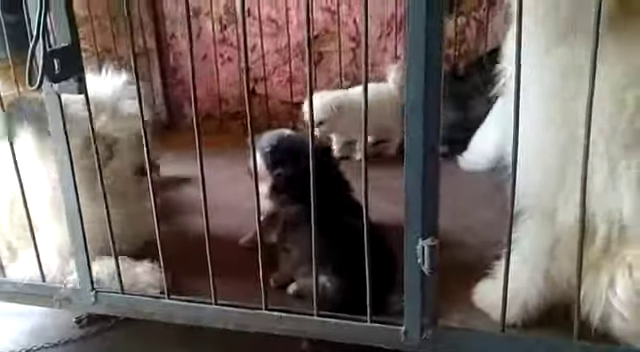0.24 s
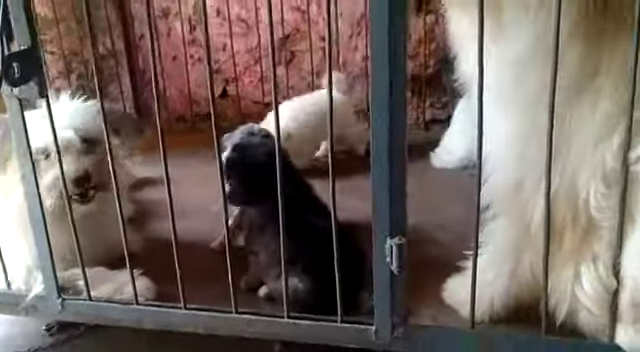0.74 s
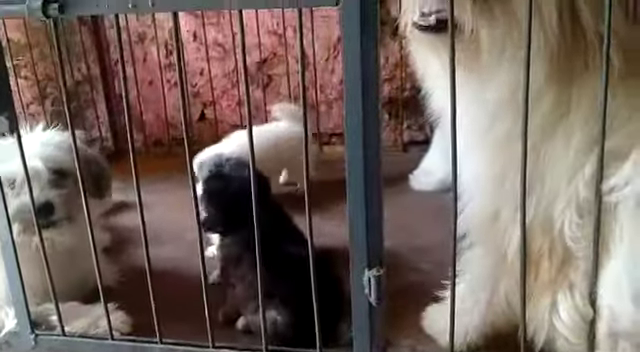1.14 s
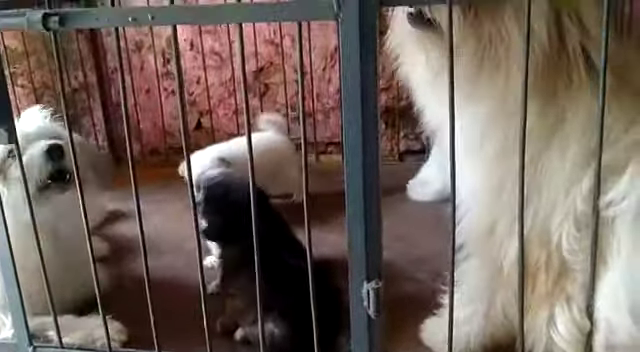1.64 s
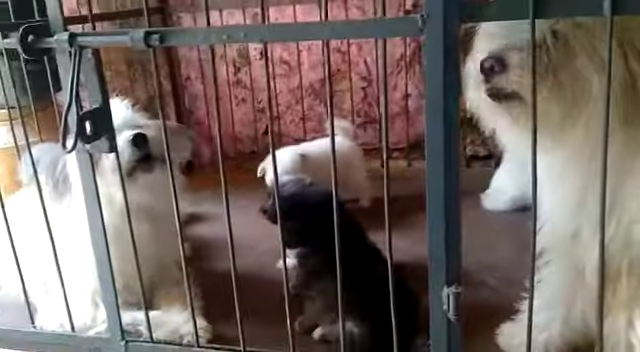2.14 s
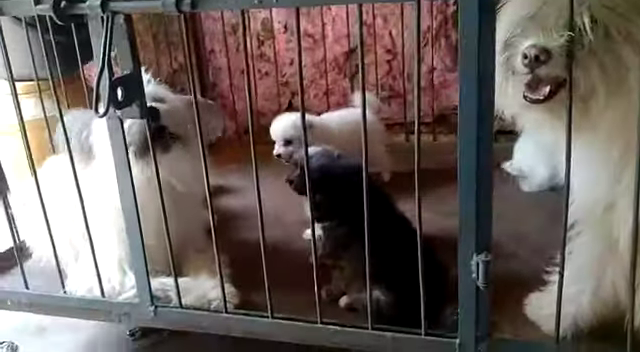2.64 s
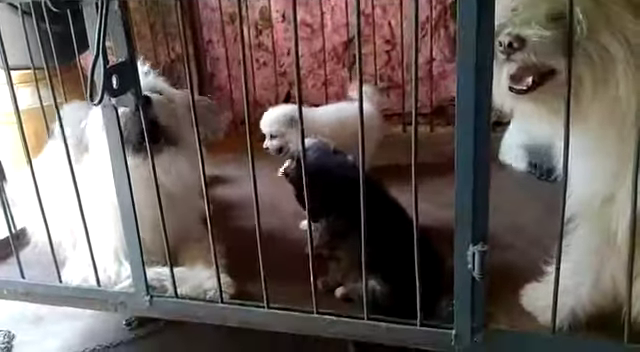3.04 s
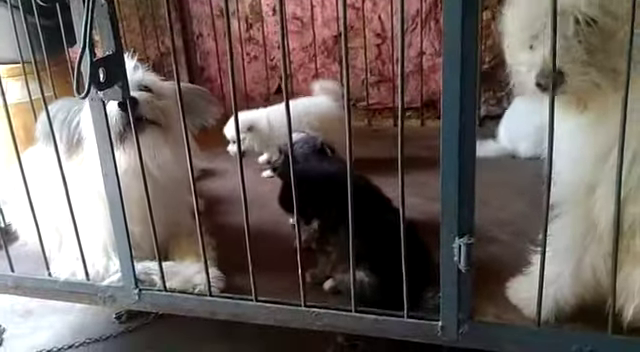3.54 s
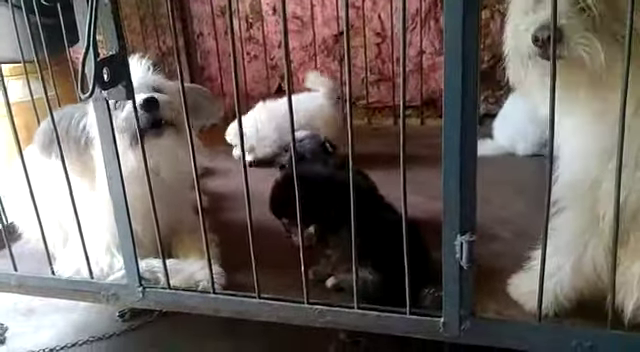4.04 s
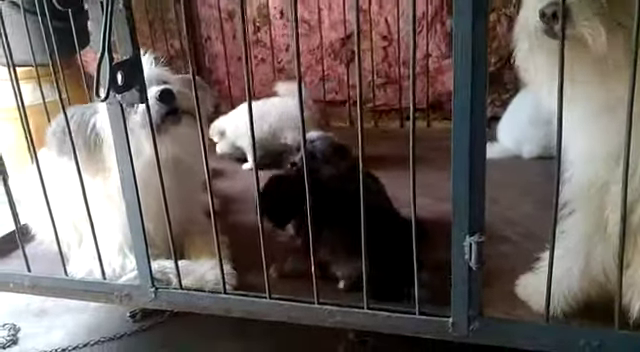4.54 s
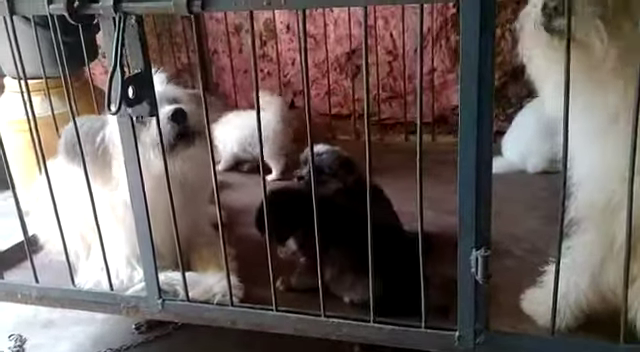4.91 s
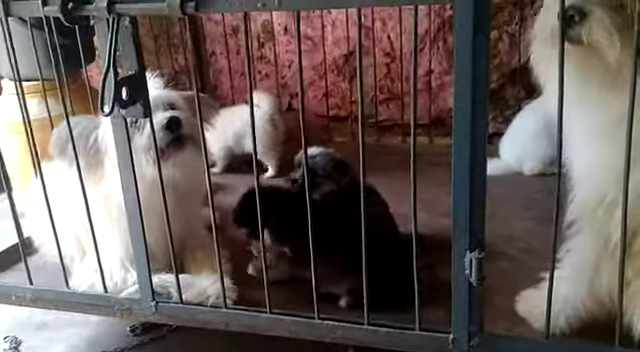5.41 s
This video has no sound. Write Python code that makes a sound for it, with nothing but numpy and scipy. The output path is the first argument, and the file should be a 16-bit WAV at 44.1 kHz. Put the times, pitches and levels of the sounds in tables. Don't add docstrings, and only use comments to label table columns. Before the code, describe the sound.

In a hard, echoing kennel, a small dog gives a wavering outcry and a string of gliding yelps, pauses, then yelps again until just past five seconds. Before it, another dog puffs twice through its nose and rustles its fur. A tiny collar jingle and faint nasal whine fill the pause. Low wind rumble, thumps and a dull far hum run underneath on a handheld microphone.

```python
import sys
import numpy as np
from scipy import signal
from scipy.fft import rfft, irfft, next_fast_len
from scipy.io import wavfile
from scipy.ndimage import uniform_filter1d, minimum_filter1d, map_coordinates

SR = 44100
rng = np.random.default_rng(int(sys.argv[2]) if len(sys.argv) > 2 else 0)


def boost(x):
    u = np.asarray(x, float) / 20
    return 10 ** u


def put_to_file(sound):
    columns = np.atleast_2d(sound).T
    safe = np.clip(columns, -1, 1)
    whole_steps = np.round(safe * 32767)
    wavfile.write(sys.argv[1], SR, whole_steps.astype(np.int16))


N = 250120
TOP_HZ = 15850


def unit(x):
    return x / np.sqrt(np.mean(x ** 2) + 1e-20)


def along(points, hz):
    f, v = np.transpose(points)
    return np.interp(np.log(hz + 1), np.log(f + 1), v)


def curves(rows, t):
    s, *cols = np.transpose(rows)
    return [np.interp(t, s, c) for c in cols]


def wobble(rate, size, order=3):
    knots = rng.standard_normal(int(size * rate / SR) + 4)
    return map_coordinates(knots, [np.arange(size) * rate / SR], order=order)


def noise(gain):
    m = next_fast_len(N)
    spectrum = rfft(rng.standard_normal(m)) * gain(np.fft.rfftfreq(m, 1 / SR))
    return unit(irfft(spectrum, m)[:N])


def coloured(points):
    return noise(lambda f: boost(along(points, f)))


def peaks(modes, f):
    return sum(boost(db) * (f * w) ** 2 / ((c * c - f * f) ** 2 + (f * w) ** 2) for c, w, db in modes)


def patchy(x):
    z = signal.stft(x, nperseg=512)[2]
    field = uniform_filter1d(rng.standard_normal(z.shape), size=5, axis=0)
    field = uniform_filter1d(field, size=4, axis=1)
    clots_db = 6.5 * unit(field)
    return unit(signal.istft(z * boost(clots_db), nperseg=512)[1][:N])


def bursts(tables, column):
    t = np.arange(N) / SR
    out = 0
    for rows in tables:
        edge = np.clip(np.minimum(t - rows[0][0], rows[-1][0] - t) / 0.0016, 0, 1)
        out = out + edge * boost(curves(rows, t)[column])
    return out


def strand(rows, scatter):
    hz = curves(rows, np.arange(N) / SR)[0] * (1 + scatter * wobble(120, N))
    tone = np.sin(2 * np.pi * np.cumsum(hz) / SR)
    return np.sqrt(2) * bursts([rows], 1) * boost(3.4 * wobble(60, N)) * tone


# frequency in Hz, level in dB per Hz.
HUM_COLOUR = [(180, -24), (300, -2), (392, -29), (470, -2.5), (555, -10.5), (624, -6), (737, -8),
              (946, 0.5), (1340, -2), (1720, -2), (2140, -1.5), (4910, -22), (16000, -34)]


def hum(over_db):
    return boost(-44.5 - 0.8 * over_db + 2.5) * coloured(HUM_COLOUR)


# time in seconds, strength in dB.
STEADY_AIR = [(0, -25), (.3, -25), (.42, -29.5), (.9, -30.5), (1.2, -35), (1.5, -26.5), (2.1, -23.5),
              (2.8, -25.5), (3.3, -38), (3.5, -27.5), (4.2, -30.5), (4.8, -25.5), (5.3, -27.5),
              (5.5, -27.5), (5.58, -32), (5.67, -30.5)]
# middle in seconds, half length in seconds, strength in dB.
GUSTS = [(0.338, 0.013, -14.5), (0.651, 0.029, -32.5), (0.729, 0.016, -15.5), (1.021, 0.046, -14.5),
         (1.137, 0.014, -29), (1.296, 0.052, -31.5), (1.746, 0.025, -14.5), (1.993, 0.1, -13),
         (2.28, 0.15, -17), (2.432, 0.019, -13.5), (2.633, 0.036, -14.5), (2.812, 0.046, -9.5),
         (2.942, 0.035, -18.5), (3.189, 0.066, -18.5), (3.66, 0.022, -35), (3.886, 0.03, -26.5),
         (4.124, 0.05, -18.5), (4.094, 0.05, -20.5), (4.388, 0.027, -19), (4.48, 0.042, -13),
         (4.569, 0.028, -16), (4.794, 0.03, -21), (4.669, 0.032, -21.5), (4.928, 0.032, -27),
         (5.266, 0.028, -20), (5.639, 0.0085, -21)]
# frequency in Hz, level in dB per Hz.
RUMBLE_COLOUR = [(8.8, -38), (15, -1), (32, 1.5), (70, 1.5), (140, -6), (200, -23.5), (260, -53.5),
                 (440, -120)]
# frequency in Hz, level in dB per Hz.
FLUTTER_COLOUR = [(80, -38.5), (150, 1.5), (250, -1), (400, -9), (700, -21), (1200, -45.5), (2000, -120)]
# time in seconds, peak in dB, pitch in Hz.
THUMPS = [
    (0.112, -23, 94.2),
    (0.334, -9, 100),
    (0.347, -17.5, 141),
    (0.377, -12.5, 156),
    (0.932, -20.5, 99),
    (1.007, -14, 96),
    (1.118, -17.5, 114),
    (1.213, -24.5, 62.5),
    (3.884, -26.5, 231),
    (5.618, -24, 65.4),
]


def wind(over_db):
    t = np.arange(N) / SR
    gusts = sum(boost(db) * np.exp(-((t - s) / half) ** 2) for s, half, db in GUSTS)
    strength_db = 20 * np.log10(boost(curves(STEADY_AIR, t)[0]) + gusts)
    rumble_db = strength_db - 2.5 * over_db
    flutter_db = -36.5 + 1.396 * (strength_db + 28.0) - 3.37 * over_db
    lumps = wobble(25, N)
    out = boost(rumble_db - 3.5) * unit(boost(2.0 * lumps) * coloured(RUMBLE_COLOUR))
    flutter_lumps = boost(3 * lumps + 2.5 * wobble(60, N))
    out += boost(flutter_db - 1.5) * unit(flutter_lumps * coloured(FLUTTER_COLOUR))
    t = np.arange(-SR // 50, SR // 50) / SR
    for s, db, hz in THUMPS:
        u = np.pi * hz * t
        push = (1 - 2 * u * u + 1.2 * u) * np.exp(-u * u)
        push = push + .5 * np.exp(-(4 * u) ** 2) + .12 * np.exp(-(11 * u) ** 2)
        out[round((s + .002) * SR) - SR // 50:][:len(t)] += boost(db + 1.5) * push
    return out


# time in seconds, pitch in Hz, level in dB.
WHINE = [(3.44, 790, -52), (3.49, 750, -41), (3.52, 720, -46), (3.54, 720, -37), (3.6, 680, -46),
         (3.64, 740, -36), (3.66, 700, -48), (3.675, 660, -38), (3.745, 740, -41), (3.8, 640, -48),
         (3.86, 630, -39), (3.885, 620, -36)]


def whine():
    return boost(-7 + 3 * wobble(30, N)) * strand(WHINE, scatter=.1)


# time in seconds, peak in dB.
JINGLE = [
    (3.49, -49),
    (3.519, -43),
    (3.552, -38),
    (3.5857, -45),
    (3.6344, -51),
]
# frequency in Hz, level in dB, time to fall 60 dB in seconds.
TAG_RING = [(3700, -7, .03), (4960, 6, 0.041), (5970, 6.5, 0.023), (7640, 14, 0.012)]
# time in seconds, peak in dB.
TICK = [
    (1.9641, -10.5),
]
# time in seconds, peak in dB, lowest frequency in Hz.
SMACKS = [
    (0.335, -33.5, 500),
    (0.379, -34.5, 500),
    (0.709, -25.5, 1500),
    (2.607, -37.5, 9250),
    (3.034, -31.5, 4000),
]


def metal_and_clicks():
    out, t = np.zeros(N), np.arange(SR // 8) / SR
    for s, db in JINGLE:
        ring = 0
        for hz, level, t60 in TAG_RING:
            fade = boost(level + rng.normal(-3, 4) - 60 * t / t60)
            ring = ring + fade * np.sin(2 * np.pi * hz * rng.normal(1, .04) * t)
        out[round(s * SR):][:len(t)] += boost(db - 10) * ring * (1 - np.exp(-t / 0.00054))
    for s, db in TICK:
        out[round((s + .0015) * SR):][:3] += boost(db + 6.0) * np.array([.6, 1, .4])
    for s, db, low_hz in SMACKS:
        high_pass = signal.butter(2, low_hz, 'high', fs=SR)
        crack = signal.lfilter(*high_pass, rng.standard_normal(len(t)))
        out[round(s * SR):][:len(t)] += boost(db - 60 * t / 0.014) * crack
    return out


# start, peak and end in seconds, level in dB.
RUSTLE = [
    (0.0, 0.041, 0.17, -45),
    (0.263, 0.36, 0.53, -42),
    (0.5, 0.533, 0.72, -49),
    (1.203, 1.355, 1.59, -39),
    (5.585, 5.622, 5.7, -42.5),
]
# frequency in Hz, level in dB per Hz.
FUR_COLOUR = [(1760, -16.5), (3000, -6), (5330, -3.5), (5880, -7), (6620, -5), (9460, -14.5), (16000, -3)]


def fur():
    rise_db, fade_db = 16.5, 26.5
    brushes = [[(a, db - rise_db), (b, db), (c, db - fade_db)] for a, b, c, db in RUSTLE]
    return bursts(brushes, 0) * boost(1.1 * wobble(84, N)) * coloured(FUR_COLOUR)


# time in seconds, hiss in dB, nose ring in dB.
SNORTS = [
    [(.7075, -9, -55), (.715, -16.5, -76), (.74, -23.5, -31), (.752, -24, -25), (.764, -33, -34.5),
     (.78, -41, -48), (.83, -46, -67), (.96, -64.5, -65)],
    [(.965, -53, -49), (.985, -42, -26.5), (1.005, -32, -15), (1.035, -29, -21.5), (1.047, -51, -33.5),
     (1.08, -63, -50)],
]
# frequency in Hz, level in dB per Hz.
SNORT_COLOUR = [(180, -13), (300, -5), (978, 0.5), (1430, 0), (1780, -6.5), (2520, 0), (3950, -10),
                (8500, 1), (9880, -4), (11100, -2.5), (16000, -2)]
# frequency in Hz, level in dB per Hz.
SNIFF_COLOUR = [(300, -20), (1700, -4), (2500, 0.5), (4000, -9), (5800, -4.5), (8500, -4.5), (10500, -16),
                (16000, -8.5)]
# frequency in Hz, width in Hz, level in dB.
NOSE = [(2030, 280, -3), (2393, 280, 1), (2800, 930, -8.5), (5570, 1030, -15)]


def snorts():
    hiss = 0
    for rows, colour in zip(SNORTS, [SNORT_COLOUR, SNIFF_COLOUR]):
        hiss = hiss + bursts([rows], 0) * coloured(colour)
    hiss = hiss * boost(1.3 * wobble(80, N))
    ring = bursts(SNORTS, 1) * boost(0.53 * wobble(96.2, N)) * noise(lambda f: peaks(NOSE, f))
    return hiss + ring


# frequency in Hz, time to fall 60 dB in seconds.
ROOM_RING = [(300, .4), (600, .42), (820, .46), (1050, .5), (1300, .37), (1600, .6), (2200, .35),
             (5000, .35), (12000, .2)]
# delay in seconds, level in dB.
SLAPS = [
    (.003, -4),
    (.011, -6),
    (.032, -4),
    (.074, -12),
]


def kennel(x):
    hz, t, z = signal.stft(rng.standard_normal(int(SR * .7)), SR, nperseg=256)
    decay = boost(-60 * t / along(ROOM_RING, hz)[:, None])
    tail = signal.istft(z * decay, SR, nperseg=256)[1]
    tail = tail / np.linalg.norm(tail)
    for s, db in SLAPS:
        tail[round(s * SR)] += boost(db)
    return signal.fftconvolve(np.pad(x, (350, 0)), tail)[:N]


def arch(start, top, end, top_hz, db, tied_in, tied_out):
    rest_hz, land_hz, top_hold_s, tied_share = 600, 590, .007, 0.3
    t = np.linspace(start, end, num=40)
    up = t < top
    climb = np.clip((t - start) / max(top - top_hold_s - start, 1e-9), 0, 1) ** 1.25
    fall_s = .017 + .1 * (end - top)
    fall = np.exp(-(np.clip(t - top - top_hold_s, 0, None) / fall_s) ** 1.5)
    low_hz = np.where(up | tied_out, rest_hz, land_hz)
    hz = low_hz + (top_hz - low_hz) * np.where(up, climb, fall)
    attack = 8 * (tied_share if tied_in else 1) * (top > start + .01) * np.clip(1 - (t - start) / .03, 0, 1)
    release = 19.5 * (tied_share if tied_out else 1) * np.clip(1 - (end - t) / 0.033, 0, 1)
    release = release + 18 * ~up * np.exp(-((hz - 1170) / 230) ** 2)
    db = db + 3.5 * np.exp(-((hz - 780) / 170) ** 2)
    high = 1 / (1 + np.exp((1040 - hz) / 60))
    half_db = EVEN_DB + high * (np.where(up, -14, -45) - EVEN_DB)
    return list(zip(t, hz, db - attack - release, half_db))


# time in seconds, pitch in Hz, level in dB, half-pitch line in dB.
CRIES = [
    [(1.514, 600, -26, -10), (1.54, 745, -15, -30), (1.555, 760, -14, -36), (1.568, 860, -19, -37)],
    [(1.574, 1250, -23, -12), (1.6, 1260, -20, -14), (1.635, 1275, -16, -22), (1.668, 1230, -26, -20),
     (1.678, 1190, -15, -28), (1.72, 1180, -11, -22), (1.765, 1210, -17, -16)],
    [(1.768, 1300, -15, -20), (1.773, 1450, -14, -31), (1.795, 1385, -13, -36), (1.83, 1360, -13, -40),
     (1.86, 1300, -12, -40), (1.869, 1280, -22, -40), (1.88, 1265, -10, -46), (1.93, 1290, -8, -46),
     (1.955, 1340, -10, -36), (1.968, 1400, -13, -44)],
    [(1.972, 1380, -17, -43), (1.983, 1100, -28, -43), (1.99, 930, -15, -43), (2.0, 900, -14, -43),
     (2.04, 940, -13, -36), (2.051, 1000, -25, -30), (2.06, 1080, -14, -20), (2.09, 1190, -16, -12),
     (2.111, 1480, -15, -15)],
    [(2.181, 600, -19, -28), (2.205, 600, -17, -28), (2.225, 660, -18, -24), (2.24, 820, -16, -24),
     (2.258, 970, -15, -24), (2.275, 1090, -18, -15), (2.295, 1270, -17, -13), (2.314, 1370, -17, -14)],
]
# time in seconds, pitch in Hz, level in dB, half-pitch line in dB.
LATE_CRIES = [
    [(3.882, 800, -18, -20), (3.897, 820, -16, -20), (3.905, 610, -16, -36), (3.915, 660, -12, -36),
     (3.93, 800, -12, -35), (3.946, 850, -15, -30), (3.951, 1000, -34, -20), (3.957, 1250, -18, -12),
     (3.975, 1280, -15, -14), (3.999, 1340, -13, -24)],
    [(4.145, 640, -25, -30), (4.17, 720, -16, -30), (4.19, 900, -14, -25), (4.205, 900, -20, -20),
     (4.215, 1050, -34, -20), (4.222, 1170, -15, -17), (4.25, 1420, -16, -15), (4.257, 1650, -14, -18),
     (4.269, 1660, -15, -30)],
    [(4.975, 600, -24, -36), (4.99, 680, -13, -36), (5.012, 880, -13, -30), (5.025, 1000, -25, -20),
     (5.035, 1300, -15, -17), (5.052, 1620, -16, -17), (5.07, 1660, -14, -24), (5.086, 1540, -17, -40)],
    [(5.09, 1100, -30, -40), (5.1, 860, -12, -40), (5.12, 750, -18, -36), (5.14, 700, -19, -36),
     (5.168, 640, -27, -36)],
]
# start, top and end in seconds, top pitch in Hz, level in dB.
ARCHES = [
    (2.112, 2.112, 2.18, 1480, -17),
    (2.315, 2.315, 2.385, 1370, -18),
    (2.455, 2.555, 2.62, 1560, -16),
    (2.688, 2.785, 2.855, 1590, -16),
    (3.015, 3.105, 3.17, 1600, -17),
    (4.0, 4.0, 4.085, 1340, -16),
    (4.27, 4.27, 4.43, 1660, -19),
    (4.431, 4.51, 4.585, 1320, -16),
    (4.696, 4.795, 4.885, 1570, -17),
]
EVEN_DB = -26


def calls():
    def near(s, times):
        return any(abs(s - other) < .005 for other in times)

    starts = [a[0] for a in ARCHES] + [rows[0][0] for rows in CRIES]
    ends = [a[2] for a in ARCHES]
    pieces = CRIES + LATE_CRIES + [arch(*a, near(a[0], ends), near(a[2], starts)) for a in ARCHES]
    out = []
    for rows in sorted(pieces, key=lambda rows: rows[0][0]):
        if out and near(rows[0][0], [out[-1][-1][0]]):
            out[-1] = out[-1] + rows
        else:
            out.append(list(rows))
    return out


def mouth_open(t):
    since = t - CRIES[0][0][0]
    outcry = 2 * (since > 0) * np.exp(-np.abs(since) / 0.15)
    tops = [*np.transpose(ARCHES)[1], 5.068]
    return outcry + sum(np.exp(-((t - top + 0.034) / 0.042) ** 2) for top in tops)


# time in seconds, irregular share from 0 to 1.
HOARSE = [(1.52, .35), (1.54, .2), (1.565, .2), (1.575, .4), (1.6, .14), (1.67, .16), (1.68, .05),
          (1.745, .06), (1.765, .4), (1.78, .03), (1.955, .02), (1.97, .5), (2.0, .08), (2.1, .28),
          (3.3, .27), (3.88, .5), (3.9, .45), (3.908, .1), (3.945, .15), (3.952, .3), (3.96, .08),
          (4.0, .1), (4.02, .25), (4.14, .55), (4.21, .4), (4.222, .08), (4.44, .08), (4.48, .3), (4.9, .3),
          (4.98, .12)]
# time in seconds, level in dB.
QUARTER = [(1.58, -27.5), (1.64, -12.5), (1.7, -24), (1.77, -17.5), (1.785, -51)]
# frequency in Hz, gain in dB.
THROAT = [(300, -28), (520, -5), (620, 1), (800, 0), (930, 3), (1050, -6), (1170, 0), (1300, 2), (1470, -5),
          (1600, 1), (1780, -17), (2200, -21), (2700, -39), (3800, -55)]
# frequency in Hz, width in Hz, level in dB.
MOUTH = [(3110, 430, -7.5), (3890, 55, -15.5), (5080, 530, -0.5), (5480, 440, -3), (6320, 130, -6.5),
         (6940, 430, -8), (7890, 240, -12.5), (9120, 1060, -16.5), (11320, 440, -23.5), (12720, 170, -8),
         (14700, 840, -18.5)]
# time in seconds, mouth level in dB.
BRIGHT = [(1.5, -5), (1.9, -1.5), (2.1, -4), (2.3, -4.5), (2.55, -0.5), (2.8, -6), (3.2, -10), (3.9, 2.5),
          (4.3, 2), (4.5, -0.5), (4.8, 1), (5.2, 1.5)]
# aimed pitch in Hz, sung pitch in Hz.
STEPS = [(300, 300), (950, 950), (1040, 990), (1075, 1135), (1170, 1175), (1390, 1385), (1465, 1425),
         (1495, 1535), (1600, 1600), (2000, 2000)]
OPEN_DB = 9.5


def yelp(rows):
    t = np.arange(rows[0][0] - .004, rows[-1][0] + 0.0052, 1 / SR)
    hz, db, half_db = curves(rows, t)
    hoarse, = curves(HOARSE, t)
    upper_db = -30.5 - 0.14 * (db + 13.0) + 19 * hoarse
    upper_db = upper_db + OPEN_DB * (mouth_open(t) - .5) + curves(BRIGHT, t)[0]
    upper_db = upper_db + .25 * np.clip(half_db - EVEN_DB, 0, None)
    dropping = -np.gradient(np.log2(uniform_filter1d(hz, size=300))) * SR
    upper_db = upper_db - 8 * np.clip(dropping / 12, 0, 1)
    blur = .018 * np.clip(5 * hoarse, .3, 1) * wobble(200, len(t))
    quarter_db, = curves(QUARTER, t)
    shake = hoarse * (.06 * wobble(80, len(t)) + .09 * wobble(300, len(t)))
    hz = uniform_filter1d(np.interp(hz, *np.transpose(STEPS)), size=150) * (1 + shake)
    turns = np.cumsum(hz) / SR
    grid = np.arange(0, SR / 2, 10)
    throat, mouth = boost(along(THROAT, grid)), peaks(MOUTH, grid)
    voice = 0
    quarters = [.75, 1.25, 1.75, 2.25] if rows[0][0] < QUARTER[-1][0] else []
    for k in [*np.arange(1, min(44, TOP_HZ * 2 / hz.min())) / 2, *quarters]:
        line_hz = k * hz
        if k % 1 == 0:
            between_db = 0
        elif k % .5 == 0:
            between_db = half_db
        else:
            between_db = quarter_db + 5 * np.sign(k - 1)
        gap = (k > 1.3) * (line_hz / 1740) * 6 * np.exp(-((line_hz - 1740) / 170) ** 2)
        low = np.interp(line_hz, grid, throat) * boost(-3.5 * np.log2(max(k, 1))) / (1 + gap)
        high = np.interp(line_hz, grid, mouth, right=0) * boost(upper_db - 2 - 0.16 * between_db) * (k > 1)
        flicker = boost(min(1.5 * k, 4) * wobble(50, len(t), order=1)) if k != 1 else 1
        phase = k * (turns + (k > 2.6) * blur) + rng.random()
        voice = voice + flicker * boost(between_db) * (low + high) * np.sin(2 * np.pi * phase)
    shimmer = boost(17 * np.minimum(hoarse, .4) * wobble(120, len(t)))
    edge = np.clip(np.minimum((t - t[0]) / .018, (t[-1] - t) / .02), 0, 1)
    effort_db = db + 0.041 * (db + 48.5) + 3 * np.log2(uniform_filter1d(hz, size=2000) / 800)
    return round(t[0] * SR), np.sqrt(2) * boost(effort_db) * edge * shimmer * voice


# time in seconds, pitch in Hz, level in dB.
SIDE_TONES = [
    [(1.526, 2250, -34), (1.538, 2000, -23), (1.548, 1950, -28), (1.557, 1880, -22), (1.57, 1750, -29),
     (1.585, 1700, -19), (1.61, 1680, -24), (1.625, 1650, -36), (1.66, 1720, -29)],
    [(3.89, 1300, -26), (3.935, 1650, -24), (3.955, 1620, -16), (3.99, 1650, -26)],
    [(2.89, 860, -34), (2.93, 760, -31), (3.01, 720, -35)],
    [(3.135, 870, -22), (3.16, 780, -24), (3.2, 780, -34), (3.3, 860, -36)],
    [(4.15, 1400, -26), (4.19, 1550, -23), (4.22, 1700, -26)],
    [(4.27, 1650, -20), (4.33, 1640, -23), (4.355, 1600, -34)],
    [(4.62, 760, -38), (4.66, 860, -31), (4.7, 860, -33)],
    [(5.12, 2050, -44), (5.15, 1950, -39), (5.21, 1950, -41)],
    [(4.01, 1620, -27), (4.07, 1640, -24), (4.115, 1650, -29)],
]


def yelps():
    out = sum(strand(rows, scatter=.05) for rows in SIDE_TONES)
    t = np.arange(N) / SR
    steady, = curves(HOARSE, t)
    hoarse = steady
    for rows in calls():
        start, call = yelp(rows)
        out[start:][:len(call)] += call
        hoarse = hoarse + 1.1 * np.exp(-((t - rows[0][0] - .02) / 0.026) ** 2)
    effort = np.sqrt(np.abs(uniform_filter1d(out ** 2, size=400)))
    wide = mouth_open(t)
    low = hoarse * boost(-9.0 + 1.76 * wobble(70, N)) * coloured(THROAT)
    high = steady * boost(-28) * boost(5 * wobble(40, N)) * patchy(noise(lambda f: peaks(MOUTH, f)))
    high = high * boost(OPEN_DB * wide + curves(BRIGHT, t)[0])
    airy = patchy(noise(lambda f: 1 / (1 + (8000 / (f + 1)) ** 4)))
    hiss = wide * boost(-35 + 2.7 * wobble(60, N)) * airy
    return out + effort * (low + high + hiss)


# frequency in Hz, half width in Hz, gain in dB.
HOLLOWS = [(3920, 175, -5), (10200, 390, -13), (12300, 230, -4)]


def hollowed(x):
    f = np.fft.rfftfreq(N, 1 / SR)
    dip_db = sum(db * np.exp(-((f - hz) / w) ** 2) for hz, w, db in HOLLOWS)
    return irfft(rfft(x) * boost(dip_db), N)


def levelled(x, knee_db, squeeze, hold_s):
    power = np.abs(uniform_filter1d(x ** 2, round(hold_s * SR)))
    return x * (1 + power / boost(2 * knee_db)) ** (-squeeze / 2)


def ducking(loud):
    knee_db, hold_s, lag_s = -22.5, 0.078, 0.044
    late = np.pad(loud ** 2, (round(lag_s * SR), 0))[:N]
    power = np.abs(uniform_filter1d(late, round(hold_s * SR)))
    return 10 * np.log10(1 + power / boost(2 * knee_db))


def scene():
    dog = hollowed(yelps())
    near = snorts() + fur() + metal_and_clicks()
    far = whine()
    barks = levelled(dog + boost(-10.0) * kennel(dog), knee_db=-16.0, squeeze=0.61, hold_s=0.0091)
    over_db = ducking(barks + near)
    echoes = kennel(boost(-1) * far + boost(-26) * near)
    return (barks + far + near + echoes + wind(over_db) + hum(over_db))[None]


def low_pass(x):
    return signal.sosfilt(signal.butter(12, 16840, fs=SR, output="sos"), x)


def record(dry):
    need = np.minimum(1, 0.5 / (np.abs(dry) + 1e-9))
    gain = uniform_filter1d(minimum_filter1d(need, size=900), size=450)
    band = np.fft.rfftfreq(N, 1 / SR) < TOP_HZ
    mix = irfft(rfft(dry * gain) * band, N)
    return low_pass(mix)


dry = scene()
out = record(dry)
put_to_file(out)
```